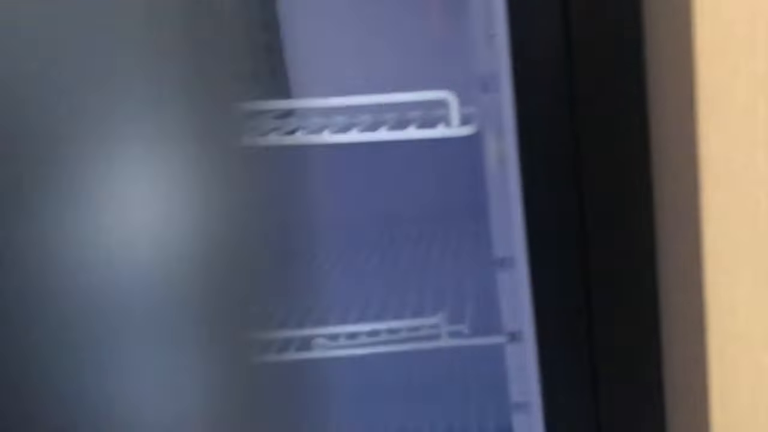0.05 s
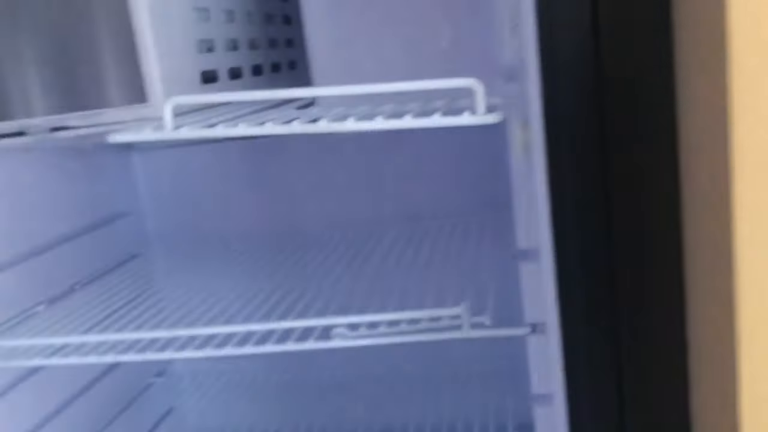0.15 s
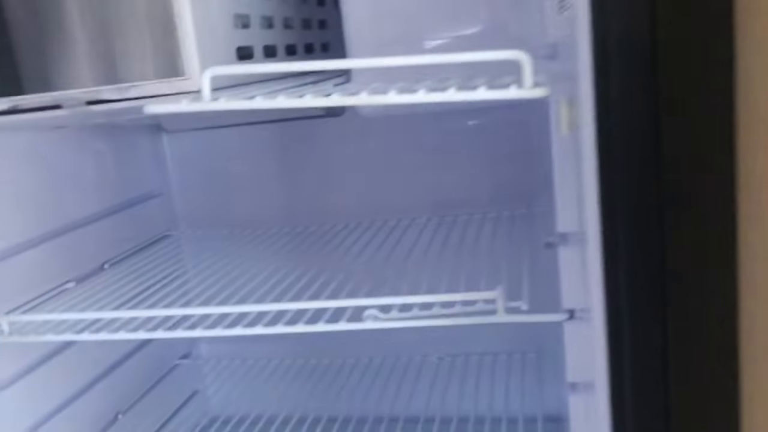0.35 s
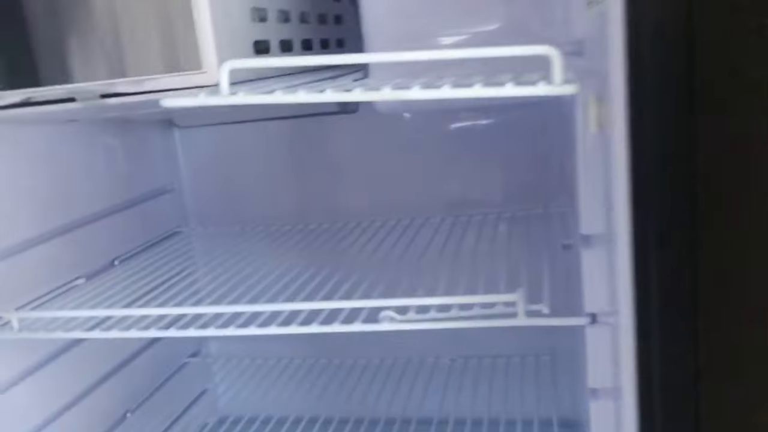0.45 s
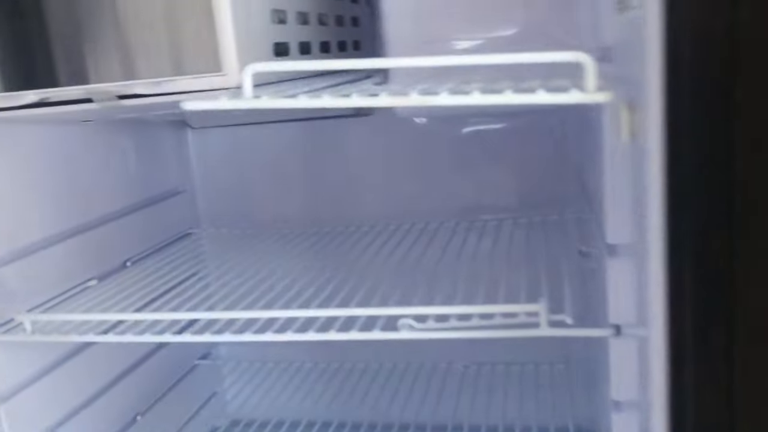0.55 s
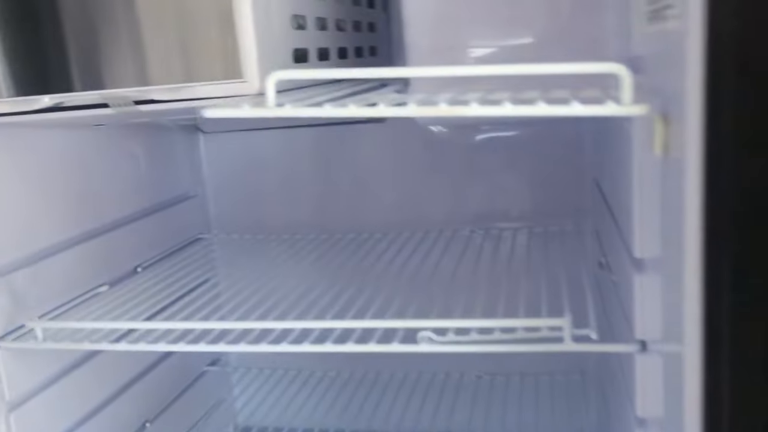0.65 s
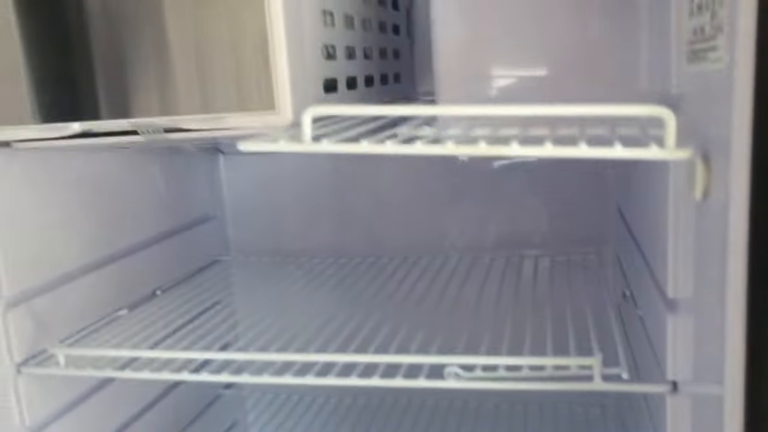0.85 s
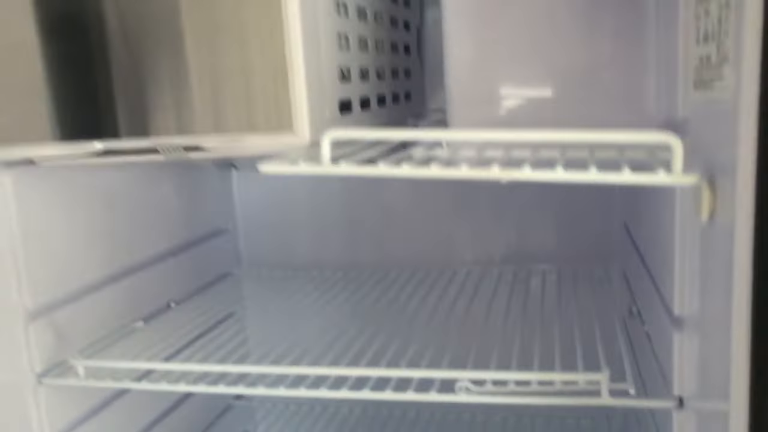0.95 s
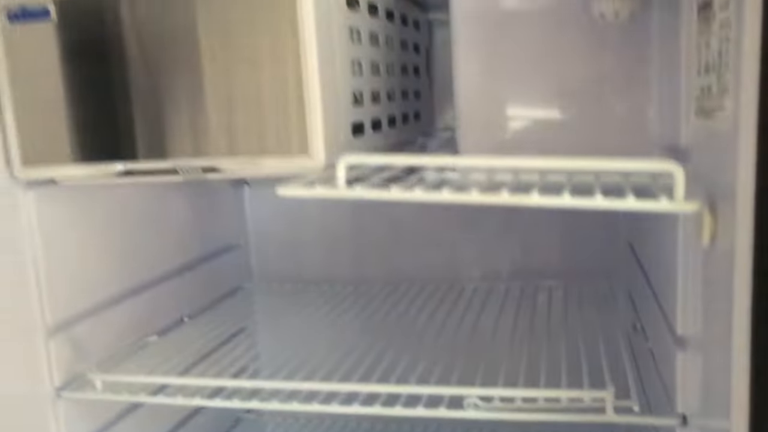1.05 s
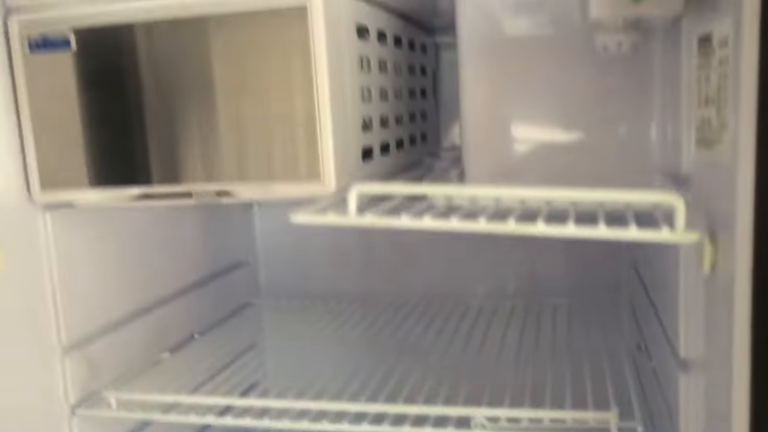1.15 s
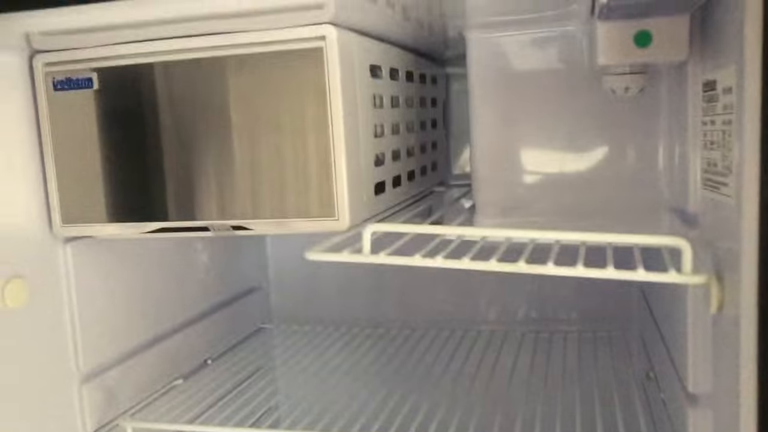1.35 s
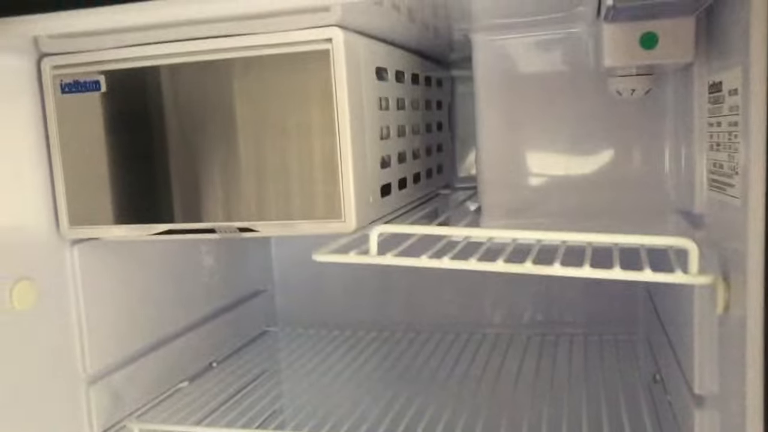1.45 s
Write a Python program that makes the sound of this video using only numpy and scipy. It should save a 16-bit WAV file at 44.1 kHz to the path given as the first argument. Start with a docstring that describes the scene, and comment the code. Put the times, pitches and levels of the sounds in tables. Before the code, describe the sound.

A small refrigerator door is opened close to the microphone. The handle clicks and rubs, the latch releases with a clunk, and the door swings away with a soft whoosh and faint ticks. Ventilation hums quietly in the cramped camper.

```python
"""A small refrigerator is opened close by, in a cramped camper filled with a ventilation hum.
First the handle clicks and rubs as it is pulled. Then the latch lets go with a clunk that makes
the door ring, and low notes swell in the cabinet. The door swings away with a soft sliding whoosh
and a low bump. Last come a few faint ticks as the door moves, while the hum carries on."""
import sys
import numpy as np
from scipy import signal
from scipy.fft import rfft, irfft
from scipy.io import wavfile
from scipy.ndimage import uniform_filter1d

SR = 44100
rng = np.random.default_rng(int(sys.argv[2]) if len(sys.argv) > 2 else 0)


def transcribe(u):
    """Save the signal u as a 16-bit wav file named by the first command-line argument.

    u: samples, shape (n,) or (channels, n), limited to [-1, 1]; the rate is SR.
    q: integer samples, one column per channel.
    """
    v = np.clip(np.atleast_2d(u).T, -1, 1)
    q = np.round(v * 32767).astype(np.int16)
    wavfile.write(sys.argv[1], SR, q)


N = 66150
T = np.arange(N) / SR


def amp(db):
    """Turns decibels (dB) into a number to multiply a sound by."""
    return 10 ** (np.asarray(db) / 20)


def value_at(points, hz):
    """Reads between rows of (frequency, value), with octaves evenly spaced."""
    row_hz, values = np.transpose(points)
    return np.interp(np.log(hz + 1), np.log(row_hz), values)


def loudness(points):
    """Loudness over time from rows of (seconds, dB), silent before and after."""
    seconds, db = np.transpose(points)
    return amp(np.interp(T, seconds, db, left=-120, right=-120))


def noise(tone):
    """Noise of a standard strength; the tone table sets only the balance of low and high."""
    gains = amp(value_at(tone, np.fft.rfftfreq(N, 1 / SR)))
    shaped = irfft(rfft(rng.standard_normal(N)) * gains, N)
    return shaped / shaped.std()


def struck(start, rise_s, fade_s):
    """Loudness of a blow: it rises quickly, then falls by 60 dB over the fade time."""
    age = np.maximum(T - start, 0)
    return (1 - np.exp(-age / rise_s)) * np.exp(-np.log(1000) * age / fade_s)


def ring(start, notes, rise_s, rise_cycles=0):
    """A struck part's fading notes, every other one flipped; rise_cycles slows the low ones most."""
    return sum((-1) ** k * amp(db) * struck(start, rise_s + rise_cycles / hz, fade_s)
               * np.sin(2 * np.pi * hz * (T - start)) for k, (hz, db, fade_s) in enumerate(notes))


def crack(start, tone, fade_s):
    """Hard plastic rings so densely and briefly that it sounds like a burst of noise."""
    return struck(start, rise_s=.0004, fade_s=fade_s) * noise(tone)


def ventilation():
    """Steady moving air with a weak, wavering drone."""
    # Each row: frequency in Hz, relative level in dB.
    air_tone = [(20, -29.5), (45, -12.5), (85, 3.5), (130, -9), (170, -2.5), (240, -9), (350, -20),
                (600, -20.5), (1020, -12), (1550, -14), (2000, -25), (2700, -29), (4000, -37.5),
                (7500, -45), (16000, -47)]
    waver = uniform_filter1d(rng.standard_normal(N), size=4000)
    drone_hz = 167.6 * (1 + .011 * waver / waver.std())
    drone = np.sin(2 * np.pi * np.cumsum(drone_hz) / SR)
    return amp(-50.5) * noise(air_tone) + amp(-64) * drone


def room_echo(sound):
    """Sound bounces around the cramped camper, each frequency dying away at its own speed."""
    # Each row: frequency in Hz, the echo's fade time in seconds.
    fade_times = [(120, 0.47), (500, 0.22), (1200, 0.18), (3000, 0.18), (8000, .18), (16000, 0.37)]
    # Each row: frequency in Hz, the echo's level in dB.
    echo_tone = [(120, -5.5), (300, -11), (500, -8), (850, -10.5), (1400, -10), (2200, -9.5), (2800, -20.5),
                 (3600, -8), (5000, -12), (7000, -6.5), (14000, -3.5)]
    hz, t, bands = signal.stft(rng.standard_normal(SR // 2), SR, nperseg=256)
    fade_s = value_at(fade_times, hz)[:, None]
    bands = bands * amp(value_at(echo_tone, hz))[:, None] * np.exp(-np.log(1000) * t / fade_s)
    bands *= np.sqrt(2 * np.log(1000) / (fade_s * SR))  # a longer fade adds no energy
    echo = signal.istft(bands, SR, nperseg=256)[1]
    echo *= np.clip(np.arange(len(echo)) / SR / .004 - .5, 0, 1)  # comes in from 2 to 6 ms
    return signal.fftconvolve(sound, echo)[:N]


def door_ticks():
    """The moving door gives a few faint ticks, each a tiny burst of noise."""
    # Each row: start in seconds, level in dB, rise time and fade time in seconds.
    ticks = [(.520, -50, .002, .04), (0.535, -38.5, 0.0021, 0.048), (1.171, -51, 0.0016, 0.036),
             (1.446, -48.5, 0.0011, 0.027)]
    # Each row: frequency in Hz, relative level in dB.
    tick_tone = [(400, -19), (900, 14), (1600, -9), (2800, 5), (4500, 2), (7500, -5.5), (10000, -16.5),
                 (16000, -10)]
    return sum(amp(db) * struck(start, rise_s, fade_s) * noise(tick_tone)
               for start, db, rise_s, fade_s in ticks)


def cabinet():
    """The cabinet swells with low notes after the clunk, then is softly bumped as the door swings."""
    # Each row: start in seconds, level in dB, rise time in seconds.
    swell_and_bump = [(.250, 3, 0.02414), (.459, -1.5, 0.0029)]
    # Each row: frequency in Hz, relative level in dB, fade time in seconds.
    cabinet_notes = [(86, -40, 0.204), (116.6, -29.5, 0.16), (160, -45.5, 0.36)]
    return sum(amp(db) * ring(start, cabinet_notes, rise_s) for start, db, rise_s in swell_and_bump)


def door_swing():
    """The door slides away with a bright whoosh, duller brushing and a fuzzy whistle at full speed."""
    # Each row: time in seconds, level in dB.
    whoosh_levels = [(.33, -75), (.365, -47.5), (.39, -53), (.42, -44.5), (.445, -44.5), (.49, -62),
                     (.55, -58.5), (.6, -68), (.66, -59.5), (.715, -58), (.76, -77), (.81, -70.5),
                     (.88, -98)]
    brush_levels = [(.33, -60), (.37, -48.5), (.47, -50.5), (.55, -52), (.6, -56.5), (.71, -57), (.77, -67)]
    # Each row: frequency in Hz, relative level in dB.
    whoosh_tone = [(300, -19.5), (1000, -2.5), (1900, 0.5), (3600, 1.5), (5000, -1), (8000, -3),
                   (14000, -4), (16000, -11)]
    brush_tone = [(150, 0), (300, 5), (580, -7), (950, 0.5), (1500, -5.5), (1900, -8.5), (2600, -1),
                  (4000, -5.5), (6000, -14.5), (16000, -36)]
    whistle_tone = [(2200, -34), (2620, 9), (3000, 1), (3600, -13.5)]
    peak_s, width_s = .416, .036
    whistle = amp(-42) * np.exp(-((T - peak_s) / width_s) ** 2) * noise(whistle_tone)
    whoosh = loudness(whoosh_levels) * noise(whoosh_tone)
    brushing = loudness(brush_levels) * noise(brush_tone)
    return whoosh + whistle + brushing


def handle():
    """The handle clicks and rubs as it takes up the pull."""
    # Each row: start in seconds, level in dB, the crack's level in dB on top of that.
    clicks = [(.1403, 3.5, -35.5), (.2140, -24, -18.5), (.2255, -18.5, -36)]
    # Each row: frequency in Hz, relative level in dB, fade time in seconds.
    handle_notes = [(280, -52, .08), (640, -37, .04), (730, -35, .09), (850, -30, .05), (1000, -33, .04),
                    (1150, -38, .04), (1600, -41, .025), (2070, -34, .018), (2900, -35, .02),
                    (3280, -36, .02)]
    # Each row: time in seconds, level in dB.
    rub_levels = [(.15, -58.5), (.18, -47.5), (.205, -52), (.236, -40.5), (.25, -75)]
    # Each row: frequency in Hz, relative level in dB.
    rub_tone = [(200, -6), (500, -2.5), (1000, 3), (2000, -11.5), (3600, -8.5), (4700, -21.5),
                (5700, -18.5), (7500, -30), (16000, -33)]
    crack_tone = [(200, -13), (900, 5.5), (1700, -4), (3700, -5), (5000, -20.5), (6400, -22), (7500, -30.5),
                  (16000, -35.5)]
    clicking = np.zeros(N)
    for start, db, crack_db in clicks:
        ringing = ring(start, handle_notes, rise_s=.001)
        cracking = amp(crack_db) * crack(start, crack_tone, fade_s=.06)
        clicking += amp(db) * (ringing + cracking)
    return clicking + loudness(rub_levels) * noise(rub_tone)


def latch():
    """The plastic catch slips, snaps free and rebounds more dully, making the door ring."""
    # Each row: start in seconds, level in dB, brightness in dB per octave.
    snaps = [(.2356, -21, 3), (.2371, 0, 0), (.2660, -20, -6)]
    # Each row: frequency in Hz, relative level in dB, fade time in seconds.
    door_notes = [(258, -24, .13), (478, -19, .1), (492, -40, .35), (672, -17, .085), (780, -12, .07),
                  (895, -16, .08), (957, -10, .095), (1160, -17, .07), (1405, -18, .05), (1490, -28, .1),
                  (2150, -17, .022), (2400, -24, .065), (2600, -28, .06), (2810, -6, .03),
                  (3060, -19, .045), (3220, -24, .045), (3990, -26, .05)]
    # Each row: frequency in Hz, relative level in dB.
    crack_tone = [(100, -30), (330, -2), (550, -3), (800, -4.5), (1800, -9), (2300, -3), (3100, -1.5),
                  (4700, -6.5), (6200, -18.5), (9000, -28), (16000, -35.5)]
    clunk = np.zeros(N)
    for start, snap_db, brightness in snaps:
        notes = [(hz, db + brightness * np.log2(hz / 1000), fade_s) for hz, db, fade_s in door_notes]
        ringing = amp(.5) * ring(start, notes, rise_s=.00089, rise_cycles=.57)
        cracking = amp(-13 + brightness) * crack(start, crack_tone, fade_s=.043)
        clunk += amp(snap_db) * (ringing + cracking)
    bass_cut = signal.butter(2, 170, "high", fs=SR, output="sos")  # cuts the deep bass from the clunk
    return signal.sosfilt(bass_cut, clunk)


def scene():
    """The door's sounds, their echo and the ventilation hum, in one channel."""
    door = handle() + latch() + door_swing() + cabinet() + door_ticks()
    return (door + room_echo(door) + ventilation())[None]


def record(dry):
    """Rounds off the loudest peaks and removes the very highest treble."""
    ceiling_db, top_hz = -1, 16150
    rounded = dry / (1 + (dry / amp(ceiling_db)) ** 4) ** .25
    treble_cut = signal.firwin(1023, top_hz, window=("kaiser", 9), fs=SR)
    return signal.oaconvolve(rounded, treble_cut[None], "same")


dry = scene()
out = record(dry)
transcribe(out)
```